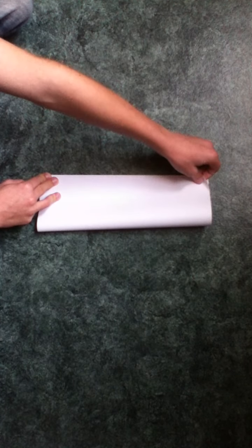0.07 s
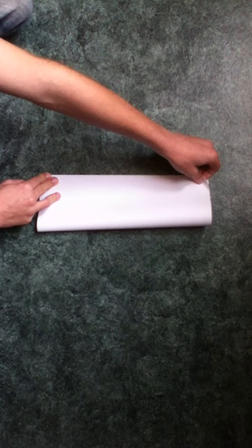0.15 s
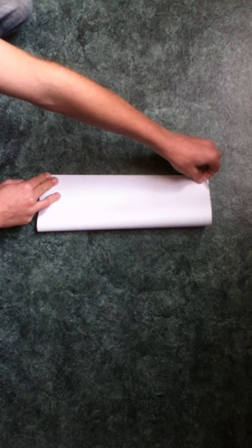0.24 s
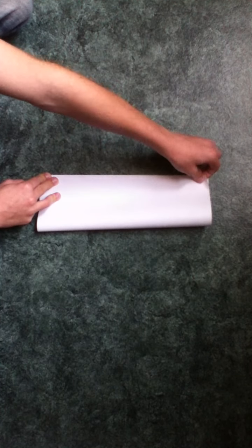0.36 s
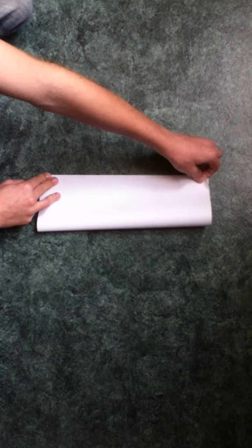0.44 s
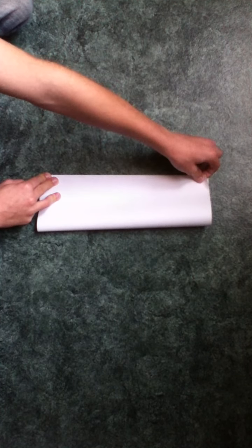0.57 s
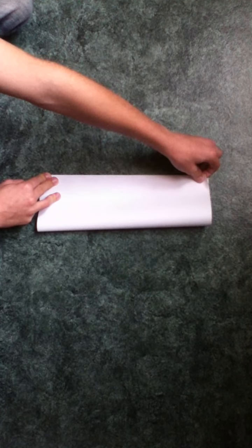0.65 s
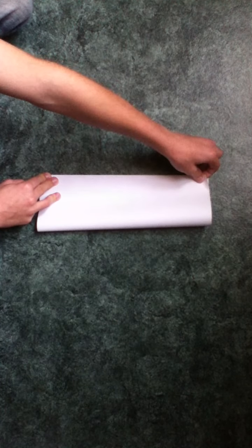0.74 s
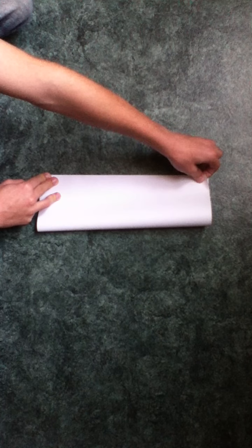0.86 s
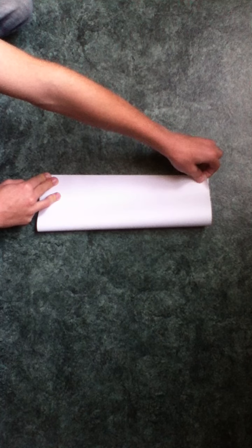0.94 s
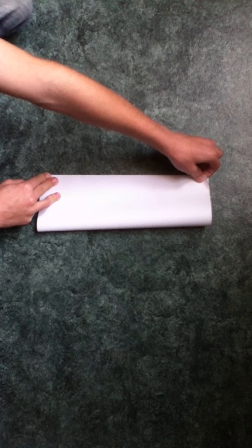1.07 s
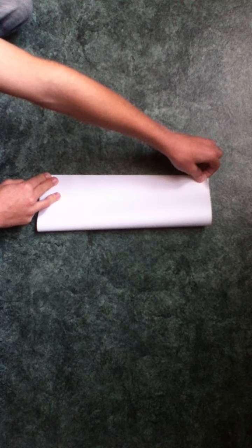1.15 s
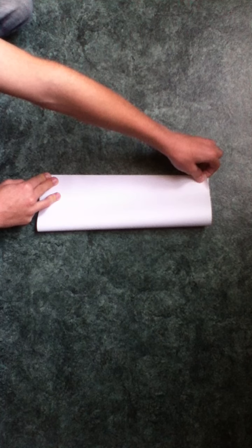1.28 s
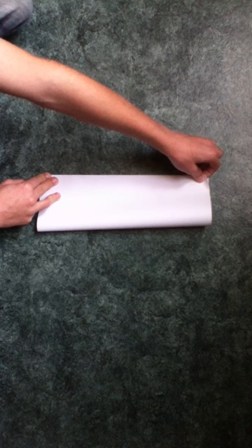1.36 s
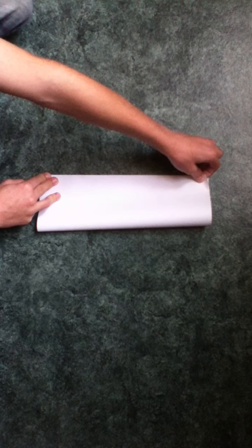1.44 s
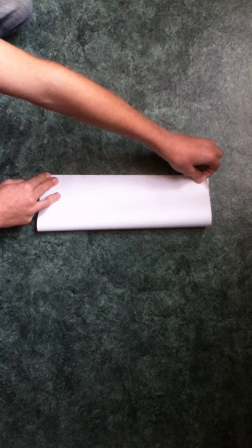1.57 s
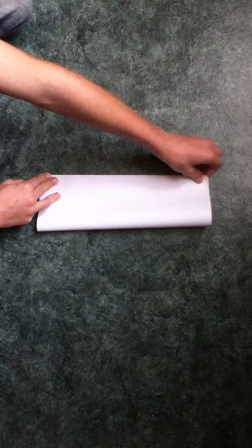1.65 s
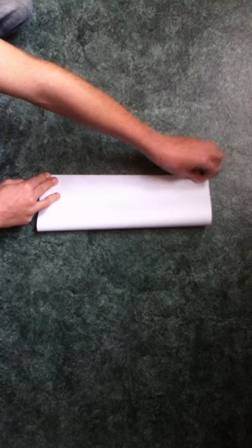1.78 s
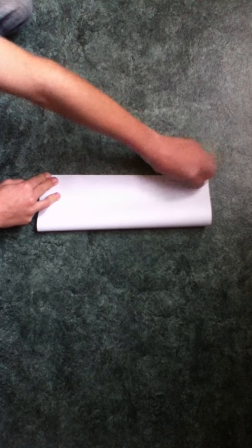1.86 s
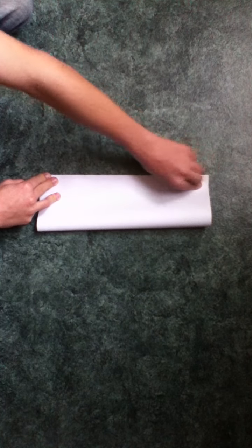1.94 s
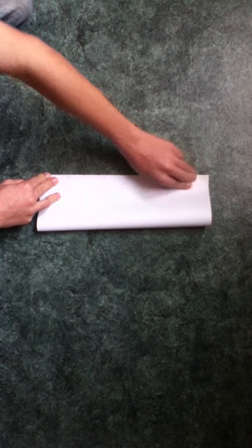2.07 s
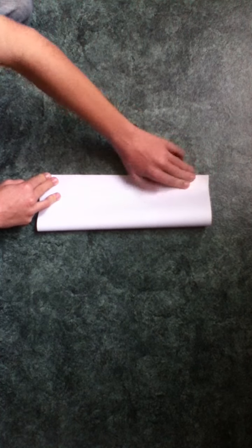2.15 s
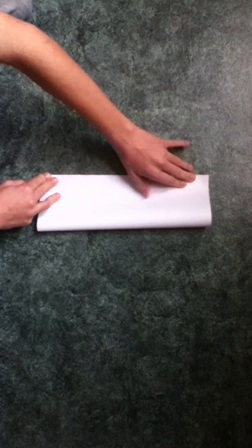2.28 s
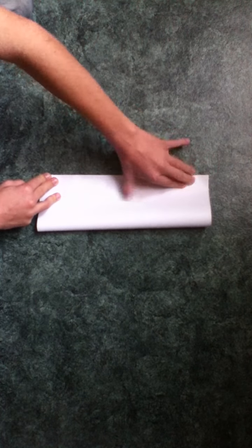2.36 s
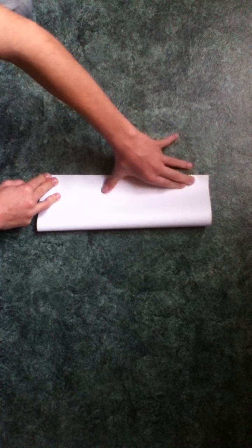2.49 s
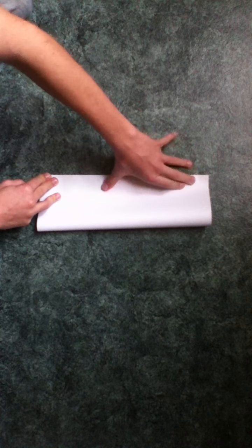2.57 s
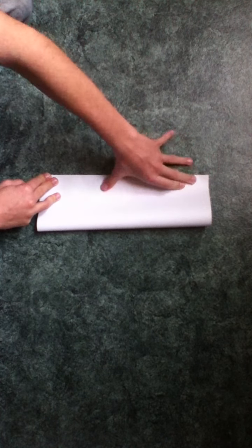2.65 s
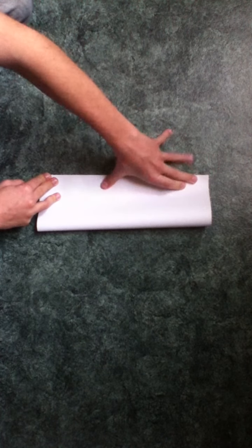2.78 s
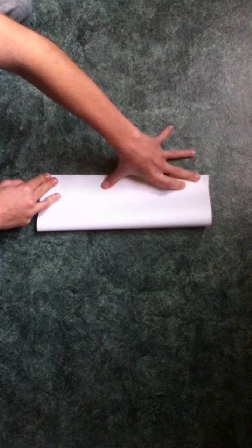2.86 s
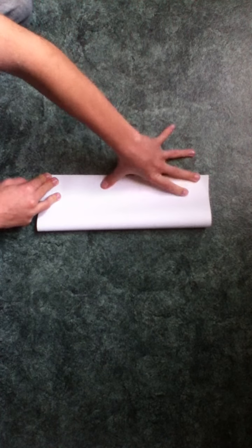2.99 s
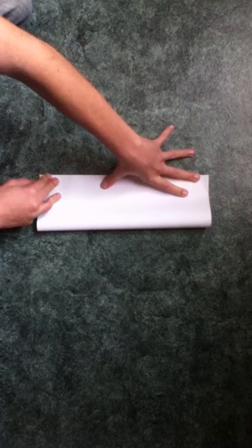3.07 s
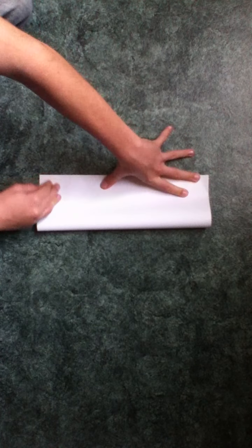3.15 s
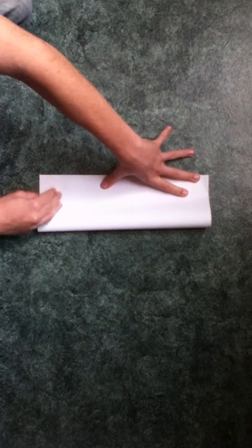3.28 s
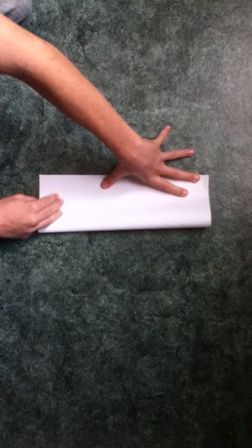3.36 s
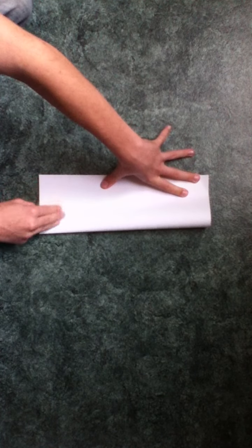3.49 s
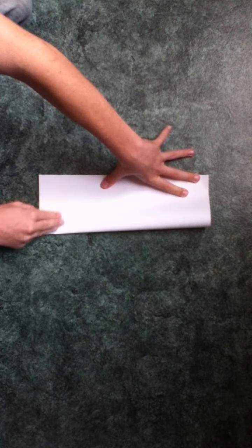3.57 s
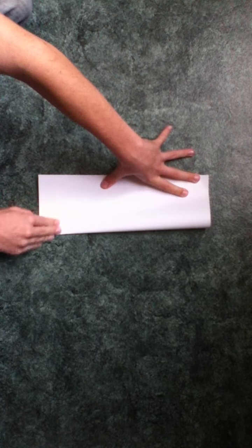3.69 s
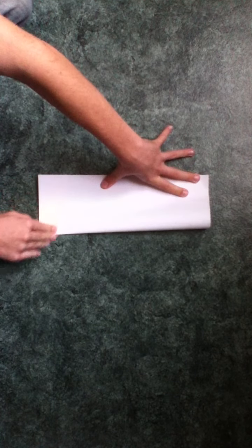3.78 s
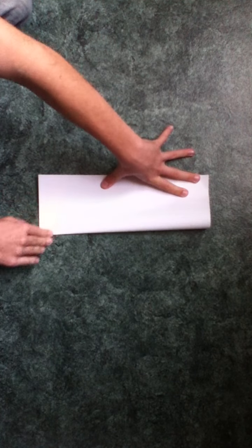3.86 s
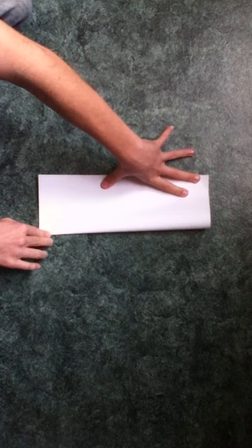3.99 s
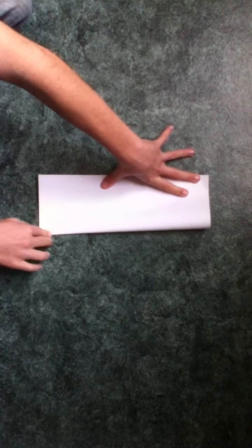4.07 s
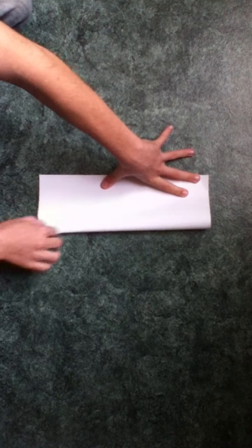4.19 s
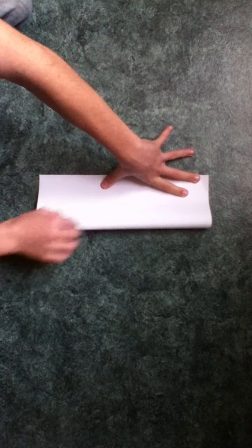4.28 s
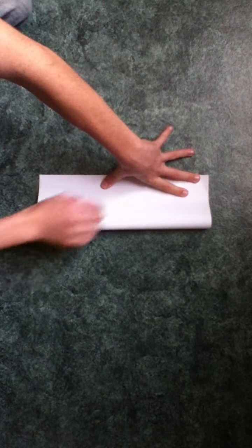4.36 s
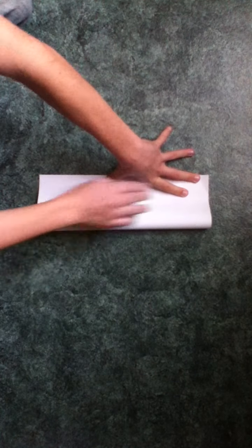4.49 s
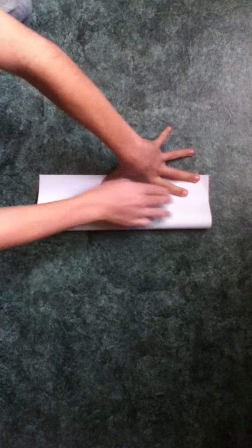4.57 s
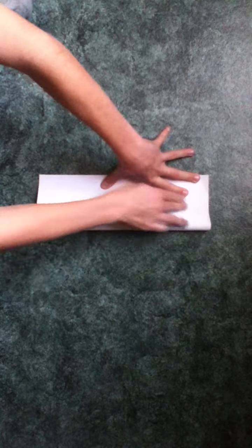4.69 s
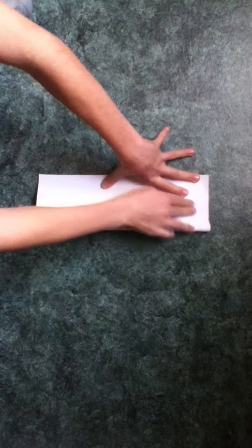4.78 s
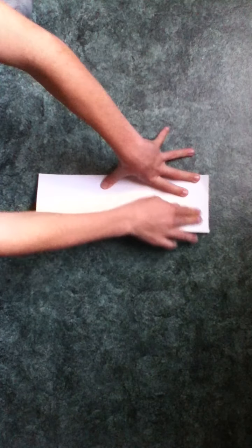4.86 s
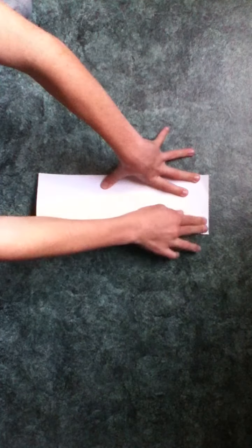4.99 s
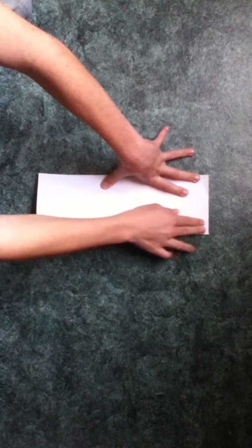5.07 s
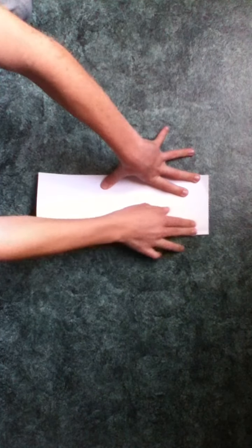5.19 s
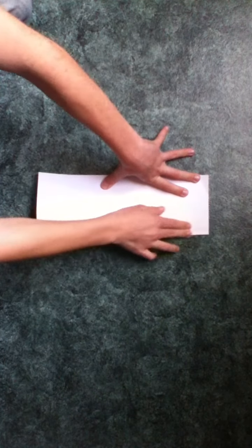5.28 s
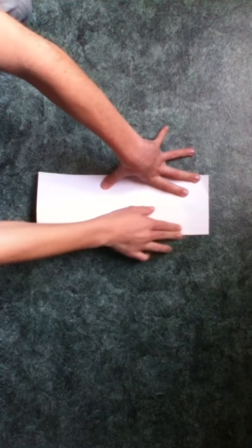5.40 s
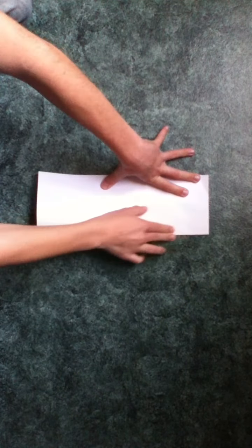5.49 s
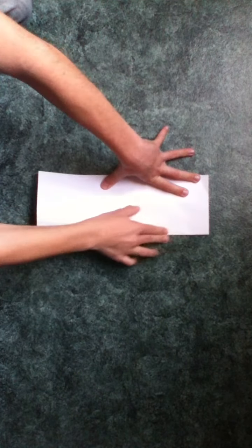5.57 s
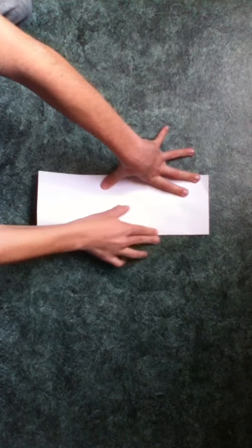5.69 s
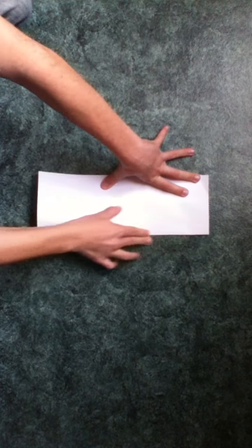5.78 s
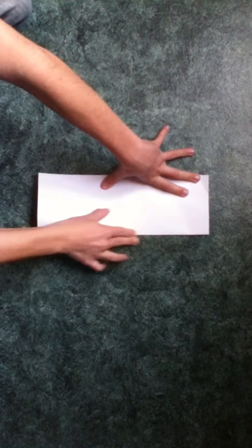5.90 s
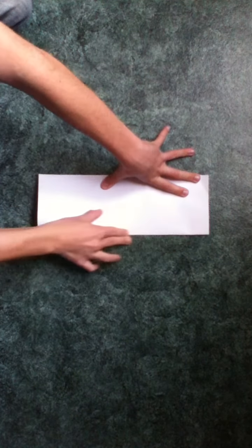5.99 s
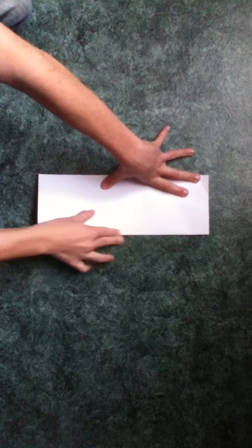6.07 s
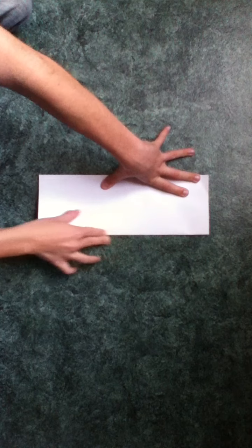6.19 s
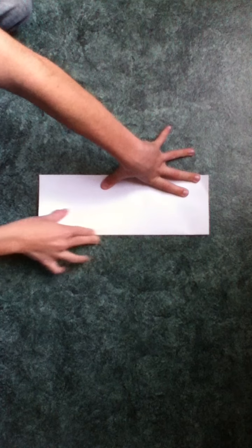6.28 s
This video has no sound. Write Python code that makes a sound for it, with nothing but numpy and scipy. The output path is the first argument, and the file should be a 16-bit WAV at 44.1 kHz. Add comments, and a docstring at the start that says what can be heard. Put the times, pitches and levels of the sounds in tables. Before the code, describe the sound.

Hands fold a sheet of paper in a small quiet room: soft dry rubbing, light pops, then two sharp snaps and a long smoothing rub.

```python
"""A faint tick of paper and a shift of fingers on its corner come first, over low hum and thin hiss.
In a small quiet room a sheet is folded lengthwise on carpet, one microphone above it: a hand lets go and
spreads, the other slides down the edge, the bowed sheet buckles in two sharp snaps, a palm rubs the fold.
Rubbing is coloured noise shaped by strokes; snaps are noise cracks with short swings and ringing modes;
the palm's bumps are low swings; echoes and a noise tail make the room."""
import sys
import numpy as np
from scipy import signal
from scipy.fft import rfft, irfft
from scipy.io import wavfile
from scipy.ndimage import uniform_filter1d

SR = 44100
rng = np.random.default_rng(int(sys.argv[2]) if len(sys.argv) > 2 else 0)


def store_wav(level_fs):
    """Save 16-bit WAV to argv[1]."""
    pcm = np.round(np.clip(np.atleast_2d(level_fs), -1, 1) * 32767)
    wavfile.write(sys.argv[1], SR, pcm.T.astype(np.int16))


N = 279594
TIME = np.arange(N) / SR
HAND_TIME = TIME[::32]  # hand movements are slow enough for a coarser clock


# Relative colour of the friction hiss at the skin: (frequency [Hz], density [dB per Hz])
HISS_COLOUR = [(400, -12), (1000, -10), (2200, -5.5), (3700, -5), (4700, -2), (6300, -1.5), (7400, -2),
               (9000, 0.5), (11500, -3), (14000, -8.5), (16000, -20)]
# Relative colour of the rubbed sheet: (frequency [Hz], density [dB per Hz])
SHEET_COLOUR = [(300, -16), (850, 5.5), (1150, -5), (1300, -3), (2200, -2.5), (3000, -2.5), (3800, -13),
                (7000, -22)]
# Strokes of skin or paper over the sheet: fingers shift on the corner (0.06 s), the hand opens and spreads
# (1.74 s), the other slides down the edge (3.06 s), the bowed paper gives way (3.93 s), and the palm
# sweeps along the fold and back (from 4.51 s). Levels are before the waver and the sheet's mix gains:
# (start [s], attack [s], hold [s], release [s], hiss level [dB], sheet level [dB],
#  hiss resonance [Hz], sheet resonance [Hz], hiss brightness [dB])
STROKES = [(0.062, 0.07, 0.11, 0.17, -67, -60.5, 5800, 1290, -5),
           (0.169, .042, 0.0077, 0.014, -45, -59, 5800, 1700, -5),
           (1.282, .012, .012, 0.027, -78, -59, 5500, 1230, -2),
           (1.379, .012, 0.065, 0.044, -64, -57.5, 5000, 1240, -3),
           (1.505, .042, 0.018, .1, -56.5, -76, 5300, 1980, -7),
           (1.589, 0.063, .008, .04, -50, -68, 6450, 1170, 0),
           (1.735, 0.14, 0.051, 0.091, -55, -61.5, 6200, 1230, -0.5),
           (1.929, 0.047, 0.15, 0.088, -52, -65, 5350, 1690, 0.5),
           (2.10, 0.056, .012, 0.067, -46.5, -47, 5460, 1390, -2),
           (2.202, 0.06, 0.062, 0.1, -49.5, -48, 5500, 1290, 1),
           (2.291, 0.057, 0.043, 0.23, -50.5, -73, 6000, 1500, 0.5),
           (2.497, 0.033, .01, 0.055, -56, -73, 5400, 1500, -1),
           (2.639, .045, .01, 0.08, -57, -79, 6100, 1550, -0.5),
           (2.734, .05, .02, .06, -58, -73, 5850, 1760, -1),
           (2.91, 0.0052, 0.033, 0.086, -47, -61, 5540, 1440, 2.5),
           (3.009, 0.016, .008, 0.03, -50, -52, 6350, 1900, 2),
           (3.064, 0.062, 0.18, .08, -53, -75, 6350, 1690, 3),
           (3.181, .007, 0.14, 0.12, -48, -47.5, 6150, 1650, -0.5),
           (3.329, 0.098, 0.071, 0.17, -48, -49, 5250, 2100, -3.5),
           (3.484, .07, 0.14, 0.14, -49, -64, 5670, 2400, -1),
           (3.717, 0.05, .015, 0.23, -50.5, -62, 5300, 2100, 0),
           (3.93, 0.0054, 0.0047, 0.097, -50, -34, 5500, 1980, -14),
           (4.089, 0.033, 0.012, 0.031, -53, -57, 5300, 1876, 0),
           (4.16, .005, 0.022, 0.076, -44, -52, 5840, 1890, -5),
           (4.508, 0.032, 0.067, 0.11, -56.5, -63, 5800, 1400, -14),
           (4.618, 0.047, 0.28, 0.066, -52, -58, 5730, 2050, -1),
           (4.993, .02, 0.44, 0.16, -53, -61, 5800, 2200, -3),
           (5.36, 0.08, 0.03, 0.055, -52, -59, 5750, 1840, -1),
           (5.467, 0.074, .9, .1, -53.5, -65, 5700, 2040, -1)]
FIRMNESS = 1.02  # exponent from stroke pressure to sheet level


def rubbing():
    """Skin hisses on the paper and shakes the sheet under it."""
    *timing, hiss_db, sheet_db, hiss_hz, sheet_hz, bright_db = np.transpose(STROKES)
    strokes = np.array([pressure(*row) for row in zip(*timing)]) * waver()

    hiss_strokes = amp(hiss_db)[:, None] * strokes
    hiss_level, hiss_centre, brightness = together(hiss_strokes, hiss_hz, bright_db)
    hiss_slips = grains(per_s=2500, spread_db=3.0, share=0.26)
    hiss = friction(hiss_slips, HISS_COLOUR, hiss_level, hiss_centre, brightness,
                    peak_db=4.5, octaves=0.24, patchy_db=2.0)

    sheet_strokes = amp(sheet_db)[:, None] * strokes ** FIRMNESS
    sheet_level, sheet_centre = together(sheet_strokes, sheet_hz)
    sheet_slips = grains(per_s=700, spread_db=4, share=0.19)
    sheet = friction(sheet_slips, SHEET_COLOUR, sheet_level, sheet_centre, np.zeros(N),
                     peak_db=9.5, octaves=0.34, patchy_db=0.5)

    # little sound leaves the sheet below its main modes
    radiation = signal.butter(8, 1170, "high", fs=SR, output="sos")
    radiated = signal.sosfilt(radiation, sheet)
    return hiss + amp(-0.85) * radiated + amp(-13.5) * sheet


def pressure(start, attack, hold, release):
    """One stroke bears down, holds, and lifts off by 20 dB in its release time."""
    t = HAND_TIME - start
    bearing_down = np.clip(t / attack, 0, 1)
    return bearing_down * amp(-20 * np.maximum(t - attack - hold, 0) / release)


UNEVEN_DB, UNEVEN_S = 0.77, 0.037  # standard deviation [dB] and spacing [s] of the waver's random points


def waver():
    """The hand's pressure wavers: a gain that drifts at random around 1."""
    steps = rng.standard_normal(size=1000)
    return amp(UNEVEN_DB * np.interp(HAND_TIME / UNEVEN_S, np.arange(len(steps)), steps))


def together(levels, *settings):
    """Overlapping strokes add in power; the louder one dominates the colour."""
    power = levels ** 2 + 1e-14
    total = power.sum(axis=0)
    curves = [np.sqrt(total)]
    for values in settings:
        curves.append((values[:, None] * power).sum(axis=0) / total)
    return [np.interp(TIME, HAND_TIME, curve) for curve in curves]


def grains(per_s, spread_db, share):
    """Countless fibres slip as a smooth noise; a few catch and let go as single clicks."""
    size = amp(spread_db * np.minimum(rng.exponential(1, N), 4)) * rng.choice([-1, 1], N)
    clicks = evened(size * (rng.random(N) < per_s / SR))
    share = np.clip(share, 0, 1)  # the clicks' part of the power
    return np.sqrt(share) * clicks + np.sqrt(1 - share) * rng.standard_normal(N)


def friction(drive, colour, level, centre_hz, bright_db, peak_db, octaves, patchy_db):
    """Slips pass a resonance that moves with the hand; uneven contact makes the colour flicker."""
    hz, t, z = signal.stft(drive, SR, nperseg=512, noverlap=384)
    hz = hz[:, None]
    resonance = peak_db * hump(hz, np.interp(t, TIME, centre_hz), octaves)
    shelf = np.interp(t, TIME, bright_db) * read([(6000, 0.088), (9000, 0.91)], hz)
    patches = uniform_filter1d(rng.standard_normal(z.shape), size=14, axis=1)
    patches = evened(uniform_filter1d(patches, size=4, axis=0))
    gain = amp(read(colour, hz) + resonance + shelf + patchy_db * patches)
    gain /= np.sqrt(np.mean(gain ** 2, axis=0))  # colour alone leaves the loudness unchanged
    return level * signal.istft(z * gain, SR, nperseg=512, noverlap=384)[1][:N]


# The sheet buckles or is tapped; the last two levels are sends relative to the direct snap:
# (time [s], thud level [dB], panel pitch [Hz], panel level [dB], overtone pitch [Hz], overtone level [dB],
#  crack centre [Hz], crack level [dB], room send [dB], sheet ring send [dB])
SNAPS = [(0.0247, -73, 1580, -55, 3140, -51, 5520, -45.5, 5, -8),
         (0.688, -61, 980, -53.5, 2580, -53, 5340, -50, 5, -11),
         (1.653, -42, 1090, -36, 4340, -31.5, 7000, -23.5, -2, -21),
         (1.826, -37, 1210, -32, 2600, -36, 5000, -41, -1, -17),
         (2.8943, -66, 1410, -59, 2500, -49, 5660, -41.5, -1, -21),
         (3.198, -62, 1630, -45, 1980, -32, 6000, -33, -7, -11.5),
         (3.6987, -42, 940, -44, 2160, -32.5, 6910, -54, 2.5, -14),
         (3.701, -46, 1580, -30.5, 2260, -30, 5300, -36, 0.5, -21),
         (3.932, -47, 1460, -20.5, 2520, -15, 5360, -17, -1.5, -8),
         (4.1288, -58, 1520, -46, 1930, -37, 6800, -58, 4.5, -18),
         (4.178, -33.5, 1510, -23, 2650, -17.5, 4000, -22.5, -1.5, -16.5),
         (4.546, -50, 985, -51, 2270, -45.5, 5640, -54, 8, -18),
         (4.6356, -51, 1290, -41, 2340, -44, 5480, -44, 3.5, -20),
         (5.7136, -61, 1380, -52, 2000, -46, 6000, -55, 0, -26)]


def snaps():
    """Every snap reaches the microphone directly, sets the sheet ringing and is thrown back by the room."""
    direct, to_room, to_sheet = np.zeros((3, N))
    for s, *row, room_db, ring_db in SNAPS:
        pop = snap(row, skirt_db=-8, skirt_octaves=0.55)
        add(direct, s, pop)
        add(to_room, s, amp(room_db) * pop)
        add(to_sheet, s, amp(ring_db) * pop)
    room = room_response(tail_db=-5.0, dull_hz=4870)
    return direct + signal.fftconvolve(to_room, room)[:N] + sheet_ring(to_sheet)


PANEL_RISE_S, OVERTONE_RISE_S = 0.00067, 0.0004
THUD_RATIO, THUD_RISE_S = 0.8, 0.00027  # the whole sheet heaves at this share of the panel's pitch
CRACK_OCTAVES, CRACK_CYCLES = 0.3, 3.22  # width of the crack, and the cycles it takes to rise


def snap(row, skirt_db, skirt_octaves):
    """The paper pops through: a crack of fibres and a few swings of the panel and its overtone."""
    thud_db, panel_hz, panel_db, overtone_hz, overtone_db, crack_hz, crack_db = row
    t = np.arange(1024) / SR
    hz = np.fft.rfftfreq(len(t), 1 / SR)

    # fibres give way at random around a rise of under a millisecond
    envelope = swell(t, CRACK_CYCLES / crack_hz)
    burst = rfft(envelope * rng.standard_normal(len(t)))
    skirt = amp(skirt_db) * hump(hz, crack_hz, skirt_octaves)
    colour = hump(hz, crack_hz, CRACK_OCTAVES) + skirt
    crack = irfft(colour * np.exp(1j * np.angle(burst)))  # the burst's phases with a smooth colour
    crack *= t < .01
    crack *= .5 * np.linalg.norm(envelope) / np.linalg.norm(crack)  # its peaks reach about 1

    pop = amp(crack_db) * crack
    swings = [(THUD_RATIO * panel_hz, thud_db, THUD_RISE_S),
              (panel_hz, panel_db, PANEL_RISE_S),
              (overtone_hz, overtone_db, OVERTONE_RISE_S)]
    for f, db, rise in swings:
        pop += amp(db) * swell(t, rise) * np.sin(2 * np.pi * f * t)
    return pop


# Modes of the bowed sheet: (frequency [Hz], relative level [dB])
SHEET_MODES = [(990, -16), (1211, 10.5), (1286, 13), (1486, 20), (1550, 5), (1667, 8), (1931, 16.5),
               (1982, -15), (2079, 12), (2185, 6.5), (2296, -23), (2403, -28), (2520, -14), (2756, -22),
               (2939, 3)]
# How long those modes ring: (frequency [Hz], time to fall 60 dB [s])
SHEET_DECAY = [(1000, 0.059), (1500, 0.12), (2100, 0.28), (2900, 0.14)]


def sheet_ring(x):
    """The modes of the bowed sheet ring on after a blow."""
    t = np.arange(SR // 2) / SR
    modes = np.zeros(len(t))
    for hz, db in SHEET_MODES:
        decay = amp(db - 60 * t / read(SHEET_DECAY, hz))
        modes += decay * np.sin(2 * np.pi * (hz * t + rng.random()))
    return signal.fftconvolve(x, modes / np.linalg.norm(modes))[:N]


# The palm presses the sheet down on the carpet: (time [s], pitch [Hz], level [dB], rise [s])
PALM_PRESSES = [(4.542, 335, -49, 0.0023), (5.325, 398, -62, 0.0038), (5.950, 318, -55.5, 0.0052)]


def presses():
    """Soft, dull bumps of the palm through the paper: low sines that swell and die."""
    out, t = np.zeros(N), np.arange(SR // 10) / SR
    for s, hz, db, rise in PALM_PRESSES:
        add(out, s, amp(db) * swell(t, rise) * np.sin(2 * np.pi * hz * t))
    return out


# Nearby surfaces, gains before the carpet's dulling: (delay [s], gain [signed ratio])
ECHOES = [(.0029, 0.25), (.0054, -.27), (.0092, .24), (.0120, -.22), (0.015, .3), (.0203, .28),
          (.0372, -.17), (.0445, .15)]


def room_response(tail_db, dull_hz):
    """Single echoes, dulled by the carpet, stand out of the tail."""
    tail = room_tail(build_s=0.00027)
    echoes = np.zeros(len(tail))
    for delay, gain in ECHOES:
        add(echoes, delay, np.array([gain]))
    dulling = signal.butter(1, min(dull_hz, SR / 3), fs=SR)
    return amp(tail_db) * tail + signal.lfilter(*dulling, echoes)


# Reverberation of the small room: (frequency [Hz], time to fall 60 dB [s])
ROOM_DECAY = [(300, 0.72), (1300, 0.42), (2200, 0.34), (4000, 0.43), (9000, 0.24), (16000, 0.65)]


def room_tail(build_s):
    """Sparse taps of random sign whose bands die at their own speeds."""
    count = SR // 2
    taps = rng.choice([-1., 1.], count) * (rng.random(count) < .2)
    hz, t, z = signal.stft(taps, SR, nperseg=256)
    decay = amp(-60 * t / read(ROOM_DECAY, hz)[:, None])
    tail = signal.istft(z * decay, SR, nperseg=256)[1]
    tail *= 1 - np.exp(-np.arange(len(tail)) / SR / build_s)
    return tail / np.linalg.norm(tail)


# The still room at the microphone: (frequency [Hz], density [dB per Hz])
ROOM_FLOOR = [(8, -80.5), (25, -72), (36, -80.5), (70, -77.5), (100, -82.5), (160, -85), (300, -91.5),
              (600, -96.5), (1200, -100), (3000, -103), (9000, -104), (16000, -109)]
# Mains hum: (frequency [Hz], level [dB rms])
MAINS_HUM = [(48.1, -62)]


def still_room():
    """Low rumble and faint hiss as shaped noise, and mains hum as a steady sine."""
    hz = np.fft.rfftfreq(N, 1 / SR)
    noise = rfft(rng.standard_normal(N))
    air = irfft(noise * amp(read(ROOM_FLOOR, hz)), N) * np.sqrt(SR / 2)  # density to amplitude
    hum = np.zeros(N)
    for f, db in MAINS_HUM:
        hum += amp(db) * np.sqrt(2) * np.sin(2 * np.pi * (f * TIME + rng.random()))
    return air + hum


def amp(db):
    """Decibels to an amplitude ratio."""
    return 10 ** (np.asarray(db) / 20)


def evened(x):
    """Scales to an rms of 1."""
    return x / np.sqrt(np.mean(x ** 2) + 1e-20)


def read(points, hz):
    """A curve over frequency, joined by straight lines on a log-frequency axis."""
    f, value = np.transpose(points)
    return np.interp(np.log(hz + 1), np.log(f + 1), value)


def add(mix, s, sound):
    """Adds a sound into the mix from s seconds on."""
    part = mix[max(round(s * SR), 0):][:len(sound)]
    part += sound[:len(part)]


def hump(hz, centre_hz, octaves):
    """A bell of height 1 on a log-frequency axis."""
    return np.exp(-.5 * (np.log2((hz + 1) / centre_hz) / octaves) ** 2)


def swell(t, rise):
    """Grows to 1 at the rise time, then dies away."""
    u = np.maximum(t, 0) / rise
    return u * np.exp(1 - u)


def scene():
    """One microphone above the sheet feeds both channels; the moving hands stir only the diffuse tail."""
    hands = rubbing() + presses()
    hands_in_room = signal.fftconvolve(hands, room_tail(build_s=0.0023))[:N]
    sound = hands + amp(-6.5) * hands_in_room + snaps() + still_room()
    return np.array([sound, sound])


def record(dry):
    """The recorder's band limit: a steep low-pass at 15.9 kHz."""
    low_pass = signal.firwin(511, 15900, window=("kaiser", 9), fs=SR)
    return signal.oaconvolve(dry, low_pass[None], "same")


dry = scene()
out = record(dry)
store_wav(out)
```